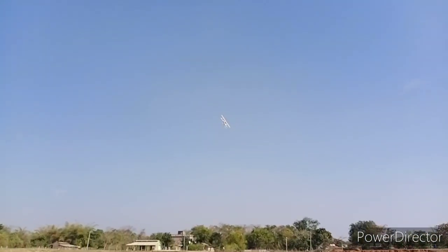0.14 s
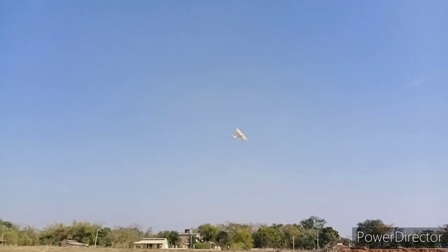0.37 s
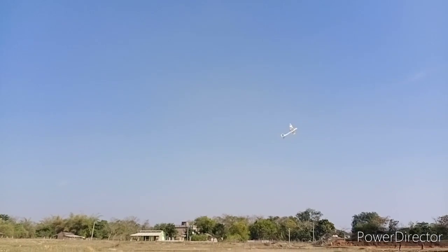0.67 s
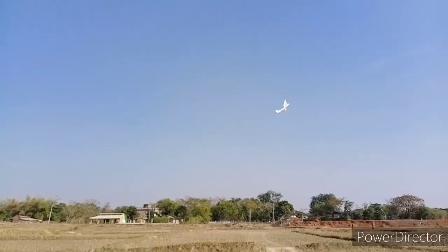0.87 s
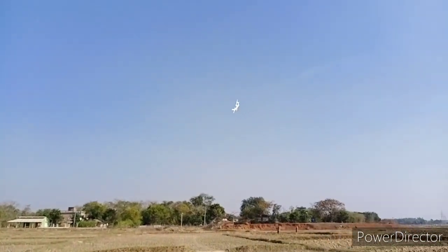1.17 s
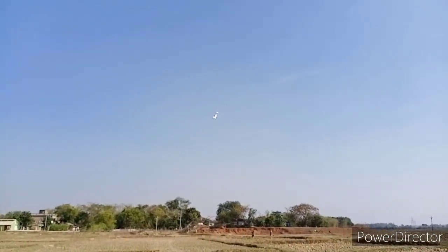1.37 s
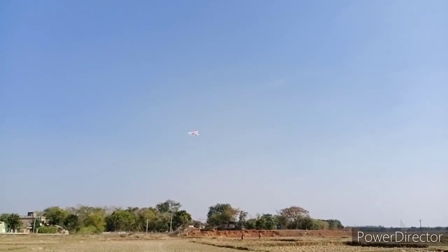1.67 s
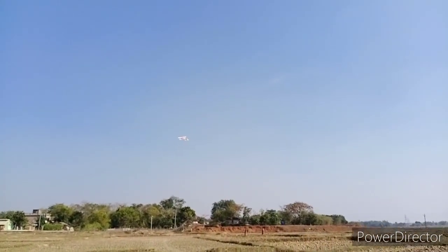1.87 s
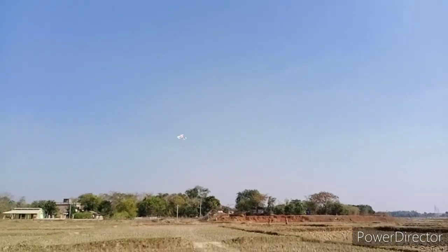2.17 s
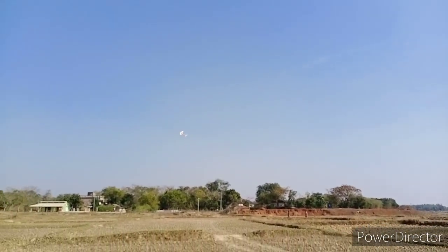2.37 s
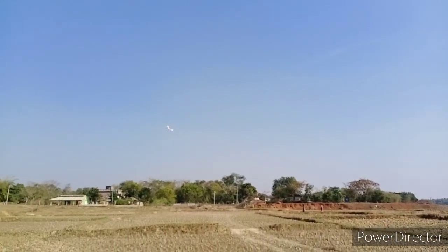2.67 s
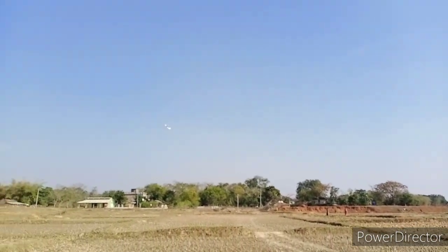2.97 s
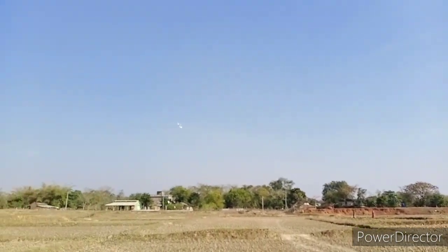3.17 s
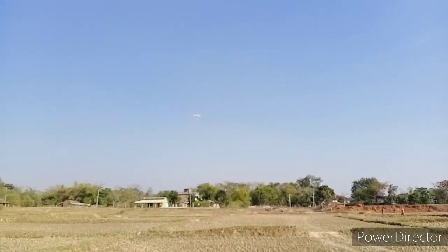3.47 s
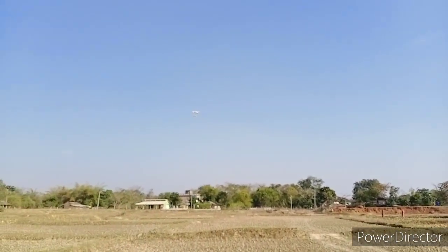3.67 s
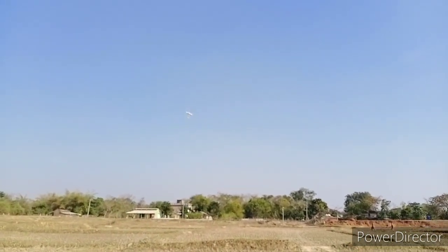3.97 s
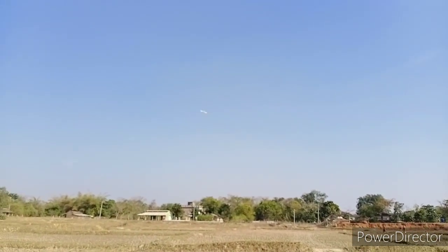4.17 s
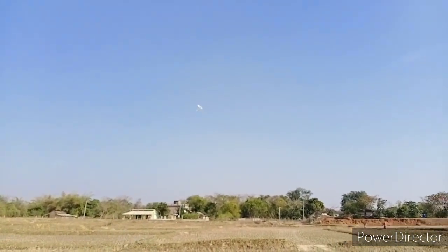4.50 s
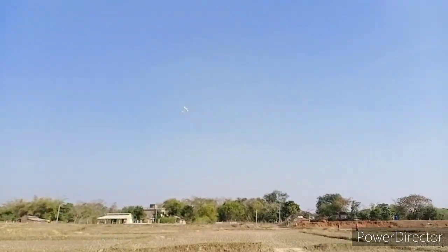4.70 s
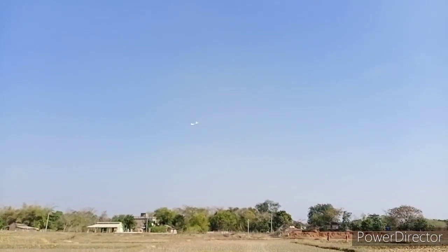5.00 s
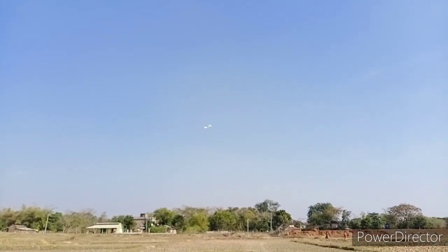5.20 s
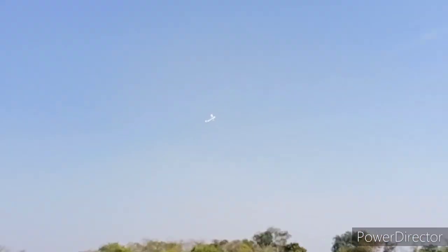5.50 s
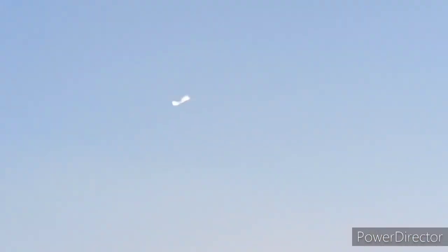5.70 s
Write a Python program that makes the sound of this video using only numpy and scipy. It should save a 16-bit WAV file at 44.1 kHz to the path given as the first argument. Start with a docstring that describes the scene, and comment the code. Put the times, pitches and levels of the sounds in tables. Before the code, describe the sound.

A phone in a windy field picks up a small toy aircraft circling at a distance. Its thin, reedy whine stays nearly constant in pitch but swells, nearly vanishes and returns. Early sizzling propeller hiss thins out later. Low gusts and soft hoots give way to heavy buffets near five seconds, with one tiny faint bird chirp; then a slightly lower, falling whine with a light rush of air.

```python
"""A model aeroplane circles over an open field, its two-blade propeller whining above field hiss.
From the start gusts rumble and hoot at the microphone; tones swell and fade through turbulent air.
The tips and the air above them hiss strongest in the first 2.5 s; hard buffets crowd in near 4.8 s.
A far bird chirps at 4.9 s. From 5.3 s the plane is on a closer leg, with a rush of air, and its
pitch falls as it turns away. Tones are summed partials of the blade rate; hiss and wind are shaped noise."""
import sys
import numpy as np
from scipy import signal
from scipy.fft import rfft, irfft, next_fast_len
from scipy.io import wavfile
from scipy.ndimage import uniform_filter1d

SR = 44100
rng = np.random.default_rng(int(sys.argv[2]) if len(sys.argv) > 2 else 0)


def generate_wav(signal):
    """Clip the signal to [-1, 1] and save it as 16-bit WAV at the path in sys.argv[1]."""
    frames = np.transpose(np.atleast_2d(signal))
    scaled = np.clip(frames, -1, 1) * 32767
    pcm = np.round(scaled).astype(np.int16)
    wavfile.write(sys.argv[1], SR, pcm)


N = 257984
T = np.arange(N) / SR  # s
SIZE = next_fast_len(N + SR // 10)  # padded FFT length, samples
MIRROR = np.array([[1], [-1]])  # opposite sign in left and right


def undb(db):
    """Decibels to amplitude."""
    return 10 ** (np.asarray(db) / 20)


def unit(x):
    """Scale to an rms of 1."""
    return x / np.sqrt(np.mean(x ** 2))


def curves(table):
    """Columns of a table joined by straight lines in time."""
    s, *columns = np.transpose(table)
    return [np.interp(T, s, column) for column in columns]


def colour(x, points, scale=1):
    """Filter by an outline of f/Hz, level/dB, with the decibels multiplied by scale."""
    hz, db = np.transpose(points)
    log_f = np.log(np.arange(SIZE // 2 + 1) * SR / SIZE + 1)
    gain = undb(scale * np.interp(log_f, np.log(hz), db))
    return irfft(rfft(x, SIZE) * gain, SIZE)[..., :N]


def noise(points):
    """Steady noise of rms 1 with the given spectral outline."""
    return unit(colour(rng.standard_normal(N), points))


def walk(rate_hz, count=5):
    """Smooth random drift of rms 1 that changes about rate_hz times a second."""
    x = rng.standard_normal(N)
    for _ in range(count):
        x = uniform_filter1d(x, int(.77 * SR / rate_hz))
    return unit(x)


def coding_holes(x, low_hz=900, high_hz=5300, depth_db=16, count=16):
    """Lossy-coding holes: each narrow band of the middle drops out alone now and then."""
    spectrum = rfft(x)
    f = np.arange(N // 2 + 1) * SR / N
    band = np.floor((f - low_hz) / (high_hz - low_hz) * count)
    out = irfft(spectrum * ((band < 0) | (band >= count)), N)
    for k in range(count):
        hole_db = depth_db * np.minimum(walk(13.0), .5)
        out = out + irfft(spectrum * (band == k), N) * undb(hole_db)
    return out


# Spectrum of the open field's hiss: f/Hz, level/dB
FIELD_COLOUR = [(30, -50), (80, -10.5), (150, 7.5), (300, -11), (700, -19), (1300, -25), (1900, -36.5),
                (4500, -30), (6000, -51), (9000, -31.5), (15400, -31)]
FIELD_DB = -68


def field():
    """Wide background hiss: a middle with lossy-coding dropouts in narrow bands, plus a steady
    side with lifted treble."""
    mid = noise(FIELD_COLOUR)
    side = colour(noise(FIELD_COLOUR), [(4000, 0.42), (8000, 5.6)])
    return undb(FIELD_DB) * (coding_holes(mid) + 0.32 * side * MIRROR)


# Far bird: t/s of onset, level/dB at the peak
BIRD_CHIRP = [(4.883, -65)]


def bird(length_s=.026, from_hz=3000, to_hz=3800):
    """A short far chirp: a sine gliding upward under a half-sine envelope."""
    (s, db), = BIRD_CHIRP
    age = np.clip((T - s) / length_s, 0, 1)
    hz = from_hz + (to_hz - from_hz) * age
    return undb(db) * np.sin(np.pi * age) * np.sin(2 * np.pi * np.cumsum(hz) / SR)


# Spectra of the low rumble, the brighter flutter and the rattle topping strong gusts: f/Hz, level/dB
RUMBLE_COLOUR = [(20, -27.5), (40, -15.5), (60, 1), (90, 10), (125, 4), (170, -4.5), (300, -47.5),
                 (1000, -110)]
FLUTTER_COLOUR = [(40, -50), (90, -35.5), (140, 8.5), (200, 6), (300, -7.5), (450, -30.5), (700, -52.5),
                  (2000, -110)]
RATTLE_COLOUR = [(150, -16.5), (280, 1), (400, -1), (550, -21), (800, -18), (2000, -100)]


def gust(rumble_db, flutter_db, lumps):
    """Turbulent pressure in three bands; the rattle gains on the rest as the gust strengthens."""
    flutter = undb(flutter_db - 4.5 + 2.9 * walk(40)) * noise(FLUTTER_COLOUR)
    rattle_db = flutter_db - 23.0 + 0.1 * (rumble_db + 13.0) + 0.6 * walk(26)
    rattle = undb(rattle_db) * noise(RATTLE_COLOUR)
    return undb(rumble_db) * lumps * (undb(-5.0) * noise(RUMBLE_COLOUR) + flutter + rattle)


# Single hard buffets, before the port thins the bass:
# t/s, swing level/dB, f/Hz, crack level/dB relative to the swing, length/cycles
BUFFETS = [(0.073, -45.5, 132, -2, 2.8), (1.386, -33.5, 88, -42, 3.9), (1.607, -28, 87, -41, 2.75),
           (1.745, -30, 87, -43, 1.9), (1.921, -30, 92, -27, 1.3), (1.973, -24.5, 94, -29, 2.4),
           (2.635, -36, 115.4, -40, 2.8), (2.756, -23.5, 99, -58, 1.85), (3.128, -33, 93.4, -30.5, 2.5),
           (4.481, -28.5, 87.3, -58, 3), (4.637, -27.5, 147, -15.5, 5.7), (4.756, -24.5, 240, -27, 5.5),
           (4.763, -16, 129.4, -39, 3.9), (4.812, -21, 133, -45, 1.96), (4.904, -19, 107, -33.5, 1.3),
           (4.927, -16.5, 107.3, -26, 1.5), (4.978, -26, 99, -40.5, 2.4), (5.017, -13, 99.2, -5, 2.9),
           (5.166, -20, 112.5, -27, 3), (5.659, -13, 113, -22, 2.7)]
# Spectrum of a buffet's crack: f/Hz, level/dB
CRACK_COLOUR = [(100, -8), (250, 16.5), (500, -4.5), (900, -23.5), (1150, -70), (2500, -110)]


def buffets():
    """Hard hits of air: each a brief swing of pressure with a sharper crack of noise on it."""
    crack, hits = noise(CRACK_COLOUR), 0
    turns = rng.random(len(BUFFETS))  # starting phase, cycles
    for (s, db, hz, crack_db, cycles), turn in zip(BUFFETS, turns):
        age = (T - s) * hz / cycles  # 0-1 over the buffet
        swing = np.exp(-((age - .6) / 0.29) ** 2) * np.cos(2 * np.pi * (hz * (T - s) + turn))
        edge = np.exp(-((age - .45) / 0.2) ** 2) * crack
        hits = hits + undb(db) * (swing + undb(crack_db) * edge)
    return colour(hits, [(25, -19.0), (70, 1.0)])  # the port passes little deep bass


# Light wind hoots across the port, before the left-right tilt:
# t/s of the centre, peak level/dB, f/Hz, half length/s
HOOTS = [(0.031, -45, 140, 0.077), (0.296, -40.5, 190, 0.052), (0.285, -43.5, 120, 0.058),
         (0.781, -42.5, 222, 0.037)]


def hoots():
    """Soft low tones blown across the port, with a wandering phase."""
    out = 0
    for s, db, hz, half in HOOTS:
        swell = undb(db) * np.exp(-((T - s) / half) ** 2)
        out = out + swell * np.cos(2 * np.pi * hz * T + walk(28))
    return out


# Gust strength before trims and lumps: t/s, rumble level/dB, flutter level/dB relative to the rumble
GUSTS = [(0.0, -49, 7.5), (0.16, -66, 11.5), (0.3, -54.5, 8.5), (0.57, -68.5, 0), (0.7, -46, -10),
         (0.82, -59, 7), (1.05, -36.5, -17.5), (1.3, -42, -16.5), (1.95, -37, -19.5), (2.42, -56.5, -9.5),
         (2.5, -43.5, -27), (2.6, -58.5, -1.5), (2.72, -51, -5), (2.9, -29, -44), (3.05, -35, -19),
         (3.2, -49, -18), (3.6, -60, -6), (3.96, -38.5, -19.5), (4.15, -42.5, -23), (4.32, -72, -1),
         (4.56, -47.5, -23), (4.64, -27.5, -22), (4.71, -35, -14.5), (4.78, -20, -10), (4.87, -23.5, -22),
         (5.05, -28.5, -6.5), (5.13, -31.5, -33), (5.2, -28.5, -6), (5.85, -24.5, -4.5)]
# Tilt of the wind: t/s, level/dB of left minus right
WIND_TILT = [(0.0, 2), (1.1, 1.5), (3.0, 2), (3.4, -2), (4.25, -3.5), (4.42, 3), (5.85, 3.5)]


def wind():
    """Lumpy gusts, nearly alike on both ports, with hard buffets and hoots in the middle."""
    rumble_db, flutter_db = curves(GUSTS)
    tilt_db, = curves(WIND_TILT)
    lumps = undb(2.74 * walk(50) + 2.63 * walk(14.7))
    mid, side = (gust(rumble_db, flutter_db, lumps) for _ in range(2))
    mid = mid + buffets() + hoots()
    return (mid + 0.13 * side * MIRROR) * undb(np.array([tilt_db, -tilt_db]) / 2)


# Spectrum of the airflow on the close leg: f/Hz, level/dB
RUSH_COLOUR = [(150, -34), (300, -8), (600, -3.5), (1200, -4.5), (2500, -8.5), (3800, -11.5), (4400, -12.5),
               (7000, -67)]
# Swell of that airflow, before its waver: t/s, level/dB
RUSH_SWELL = [(5.1, -79), (5.28, -73.5), (5.35, -64.5), (5.85, -64.5)]


def air_rush():
    """Airflow of the close leg: broad noise that swells near the end and wavers slightly."""
    return noise(RUSH_COLOUR) * undb(curves(RUSH_SWELL)[0] + 1.5 * walk(15))


# Swells and fades of one partial as eddies drift through the path:
# t/s of the centre, order in blade rates, change of level/dB, half length/s
PARTIAL_FADES = [(0.545, 1, -15, 0.096), (1.17, 1, -13, 0.13), (1.403, 1, -7, 0.14), (1.593, 1, -27, 0.1),
                 (2.098, 1, -22, 0.23), (3.783, 1, -48.5, 0.26), (4.271, 1, -23.5, 0.11),
                 (4.811, 1, -21.5, 0.15), (5.446, 1, -10, 0.27), (0.128, 1.5, 32, 0.11),
                 (0.78, 1.5, 27.5, 0.26), (1.425, 1.5, 27.5, 0.19), (2.47, 1.5, 31, .08),
                 (4.491, 1.5, 17.5, 0.8), (5.492, 1.5, 22.5, 0.16), (0.12, 2.5, 21, 0.14),
                 (0.708, 2.5, 24, 0.27), (2.416, 2.5, 17.5, 0.17), (4.557, 3.5, 28.5, 0.23),
                 (4.868, 3.5, 29, 0.042), (1.817, 4, -29, 0.026), (2.407, 4, -9, 0.063),
                 (1.306, 4, 10, 0.098), (1.57, 4, 10, 0.037), (1.74, 4, 11, 0.034), (3.48, 4, -12, 0.22),
                 (4.043, 4, -28, 0.05), (4.264, 4, -12.5, 0.16), (4.809, 4, -34, 0.053),
                 (5.797, 4, -16, 0.21), (0.063, 5, 11.5, 0.072), (0.23, 5, -6, 0.037), (0.61, 5, 9.5, 0.11),
                 (1.497, 5, -18, 0.022), (3.07, 5, -12, 0.042), (4.054, 5, -20, 0.035),
                 (4.072, 5, -6.5, 0.51), (4.773, 5, -21, 0.076), (5, 5, 7.5, 0.17), (5.42, 5, 7.5, 0.092),
                 (5.642, 5, -10, 0.047), (0.284, 6, 11.5, 0.28), (0.846, 6, 8, 0.26), (2.83, 6, -28, 0.21),
                 (4.06, 6, -14, 0.045), (4.797, 6, -19.5, 0.05), (5.367, 6, -11.5, 0.05),
                 (4.19, 6, 11.5, 0.053), (4.43, 6, 21.5, 0.12), (5.577, 6, 16.5, 0.07),
                 (5.802, 6, -18, 0.051), (0.137, 7, 10.5, 0.15), (0.42, 7, -16, 0.052),
                 (2.726, 7, 15.5, 0.19), (3.958, 7, -18, 0.16), (4.345, 7, 4.5, 0.38),
                 (4.854, 7, -30.5, 0.14), (5.56, 7, -18, 0.085), (5.36, 7, 7, 0.048), (0.473, 8, 13, 0.085),
                 (2.612, 8, -24, 0.12), (3.794, 8, 7.5, 0.6), (5.33, 8, -18.5, 0.11), (5.717, 8, -8, 0.044),
                 (0.34, 9, 9, 0.2), (1.294, 9, 9.5, 0.55), (4.303, 9, 14, 1), (5.43, 9, 8, 0.16),
                 (5.68, 10, 16.5, .26), (5.762, 5.5, 48, 0.045)]


def fades(order):
    """Summed swells and fades of one partial, in dB."""
    change_db = 0
    for s, k, db, half in PARTIAL_FADES:
        if round(2 * k) == round(2 * order):
            change_db = change_db + db * np.exp(-np.abs((T - s) / half) ** 2.24)
    return change_db


# Turbulence on the path: t/s, strength (a factor on the scatter)
EDDIES = [(0, 0.48), (1.8, 1.68), (2.3, 0.87), (3.4, 0.75), (4, 1.13), (5.28, 0.47), (5.4, 1.02)]


def tone(phase, order, gain, fuzz, sway):
    """A partial of rms level gain, plus the part that eddies on the path scatter around it."""
    # scatter leans towards the mean level, so the tone is roughest where it fades
    spread = curves(EDDIES)[0] * np.sqrt(gain * uniform_filter1d(gain, SR // 2))
    scattered = 0
    for axis in (1, 1j):
        scattered = scattered + axis * spread * (fuzz * walk(263) + sway * walk(56))
    return np.sqrt(2) * np.real((gain + scattered) * np.exp(1j * order * phase))


# Blade passes, one table per leg of the flight: t/s, f/Hz
BLADE_RATE = [
    [(0.0, 777.9), (0.03, 782.8), (0.44, 803.5), (0.54, 804.5), (0.95, 783), (1.3, 779.5), (2.2, 773),
     (2.6, 777), (3.55, 779), (3.9, 774), (4.35, 772.5), (4.68, 760.5), (4.85, 764), (5.15, 768),
     (5.3, 764.4)],
    [(5.305, 745.0), (5.401, 749.0), (5.601, 733.0), (5.83, 701.8)],
]
# Strongest tones, one table per leg: t/s, level/dB of the third blade harmonic, level/dB of the second
WHINE = [
    [(0.0, -41.5, -41.5), (0.45, -41.5, -55.5), (0.62, -43.5, -54), (0.8, -39, -45), (1.2, -47, -49.5),
     (1.45, -56, -54.5), (1.56, -62.5, -63), (1.75, -52, -51), (1.98, -42.5, -54.5), (2.12, -49, -47),
     (2.35, -37.5, -49.5), (2.85, -45, -64.5), (3.15, -43, -51), (3.42, -44.5, -51.5), (3.7, -67.5, -58.5),
     (4.05, -42, -63.5), (4.21, -53, -69), (4.38, -44, -59.5), (4.8, -52.5, -60.5), (5.1, -40, -62.5),
     (5.3, -39, -51)],
    [(5.305, -45, -48), (5.42, -42.5, -49.5), (5.62, -56, -52.5), (5.75, -46, -50.5), (5.85, -49, -59)],
]
# Weaker tones, before fades: blade harmonic, level/dB, random waver/dB
WEAK_TONES = [(1, -56.5, 1.5), (4, -60, 2), (5, -62.5, 1)]
# Tones of unequal blades, before fades and waver: order in blade rates, level/dB
SHAFT_TONES = [(1.5, -100), (2.5, -96), (3.5, -100), (5.5, -110)]
# Upper tones, before fades and waver: blade harmonic, level/dB relative to the tip hiss curve
HIGH_TONES = [(6, -15.5), (7, -14), (8, -15), (9, -19.5), (10, -27.5)]
# Highest tones, before the shared dip and waver: blade harmonic, level/dB relative to the top air hiss curve
TOP_TONES = [(11, -18.5), (12, -23), (13, -23), (14, -37.5)]
# Slow dip shared by the highest tones: t/s, change of level/dB
TOP_TONES_DIP = [(0.62, -7), (0.8, -10.5), (2.7, -16), (2.95, -2)]
# Hiss curves, before trim and waver: t/s, tip hiss level/dB, top air hiss level/dB
HISS = [(0.0, -59.5, -74), (0.26, -53, -54), (0.41, -54, -60.5), (0.55, -52, -56.5), (0.72, -56, -66.5),
        (1.2, -49.5, -54), (1.87, -51.5, -54.5), (2.4, -58.5, -73.5), (2.68, -71.5, -96),
        (3.07, -59.5, -74), (3.3, -60, -84), (3.55, -60.5, -72.5), (4.3, -69, -93), (4.9, -58.5, -85.5),
        (5.3, -67.5, -86), (5.85, -68.5, -80.5)]
# Spectra of the tip hiss and of the top air hiss: f/Hz, level/dB
TIP_COLOUR = [(4200, -55.5), (5000, -14), (5600, 3.5), (6200, 7.5), (7000, 18), (7800, 5), (8600, -13.5),
              (9500, -80)]
TOP_COLOUR = [(7000, -45), (9000, -7), (10500, 0.5), (12500, 0.5), (15000, 12), (16000, 17.5)]


def propeller():
    """Blade tones, shaft tones between them, and hiss that pulses once per blade pass."""
    hz, = curves(np.vstack(BLADE_RATE))
    phase = 2 * np.pi * np.cumsum(hz) / SR
    third_db, second_db = curves(np.vstack(WHINE))
    tip_db, top_db = curves(HISS)
    blade_tones = [(2, second_db), (3, third_db)]
    for k, db, waver_db in WEAK_TONES:
        blade_tones.append((k, db + fades(k) + waver_db * walk(23.0)))
    out = 0
    for k, db in blade_tones:
        shortness = (k - 1) ** 2  # shorter waves scatter more
        out = out + tone(phase, k, undb(db), 0.059 + 0.009 * shortness, 0.14 + 0.01 * shortness)
    for k, db in SHAFT_TONES:
        level_db = db + fades(k) + 4.6 * walk(9.4)
        out = out + tone(phase, k, undb(level_db), 0.32, 0.59)
    for k, db in HIGH_TONES:
        level_db = tip_db + db + fades(k) + 3.6 * walk(12.0)
        out = out + tone(phase, k, undb(level_db), 0.21 * (k - 4.5), 0.17 * (k - 4.5))
    dip_db, = curves(TOP_TONES_DIP)
    for k, db in TOP_TONES:
        level_db = top_db + dip_db + db + 3.0 * walk(8)
        out = out + tone(phase, k, undb(level_db), 0.46, .4)
    pulse = 1 + 0.13 * np.cos(phase)
    tip_hiss = unit(colour(pulse * rng.standard_normal(N), TIP_COLOUR))
    top_hiss = unit(colour(pulse * rng.standard_normal(N), TOP_COLOUR))
    tips = tip_hiss * undb(tip_db - 6.0 + 1.9 * walk(77))
    top = top_hiss * undb(top_db - 2.0 + 2.0 * walk(30))
    return out + tips + top


# Tone difference between the microphone ports, scaled for each port: f/Hz, level/dB of left minus right
PORT_COLOUR = [(100, -13.5), (700, 5), (1400, 7.5), (2400, 5), (4400, 4.5), (5800, 5.5), (7200, -7),
               (10000, -28.5), (15000, -5.5)]


def ports(far):
    """Each microphone port colours distant sound in its own, roughly opposite way."""
    return np.array([colour(far, PORT_COLOUR, scale=0.35), colour(far, PORT_COLOUR, scale=-0.52)])


def scene():
    """Field hiss and wind around the distant bird, air rush and propeller."""
    far = bird() + air_rush() + propeller()
    return field() + wind() + ports(far)


def record(dry):
    """The phone cuts the top with a steep low-pass at 15500 Hz."""
    return signal.sosfilt(signal.ellip(10, .2, 80, 15500, fs=SR, output="sos"), dry)


dry = scene()
out = record(dry)
generate_wav(out)
```